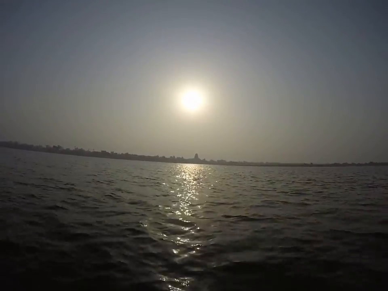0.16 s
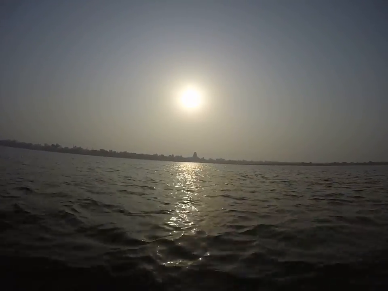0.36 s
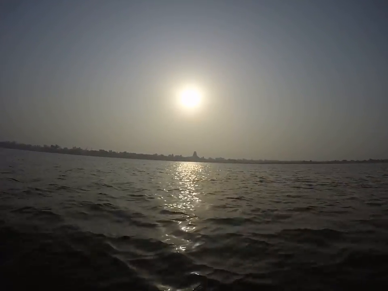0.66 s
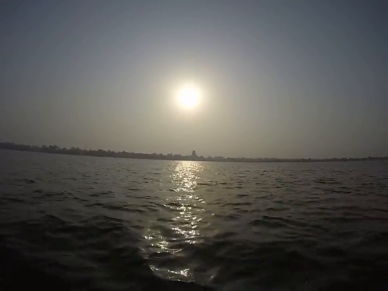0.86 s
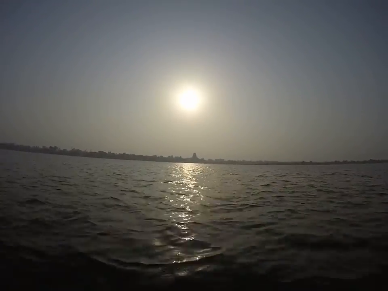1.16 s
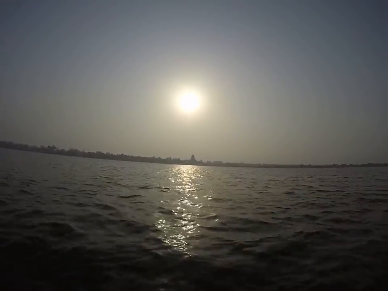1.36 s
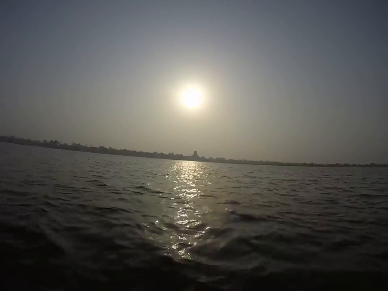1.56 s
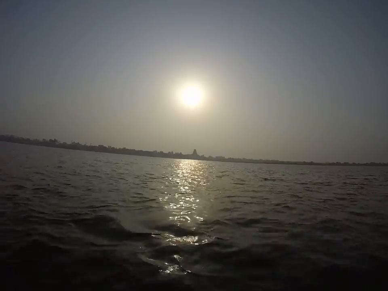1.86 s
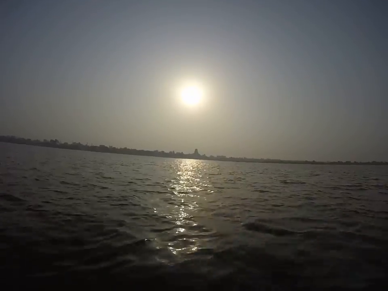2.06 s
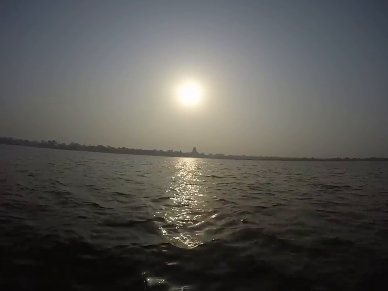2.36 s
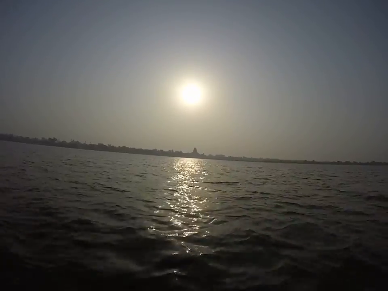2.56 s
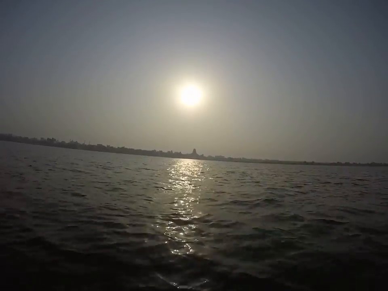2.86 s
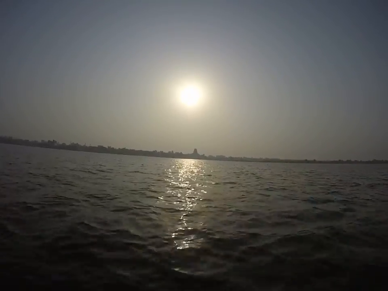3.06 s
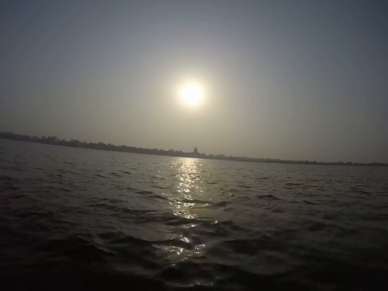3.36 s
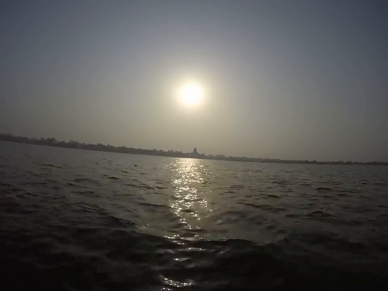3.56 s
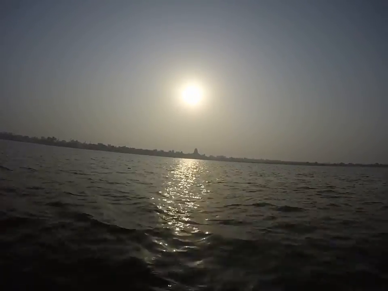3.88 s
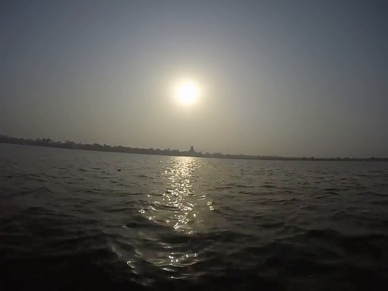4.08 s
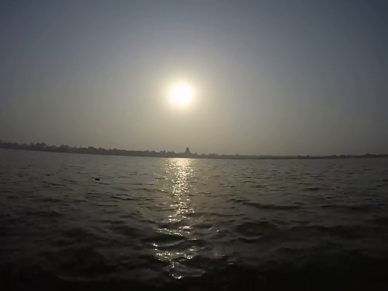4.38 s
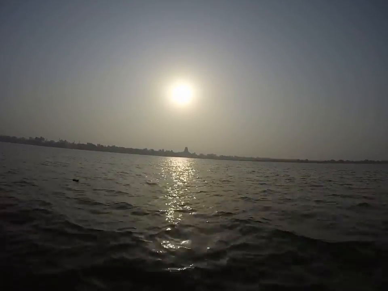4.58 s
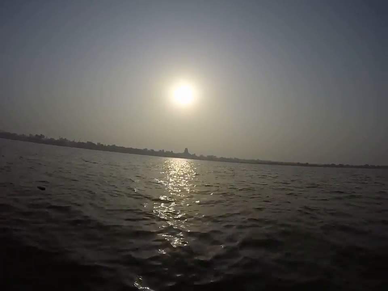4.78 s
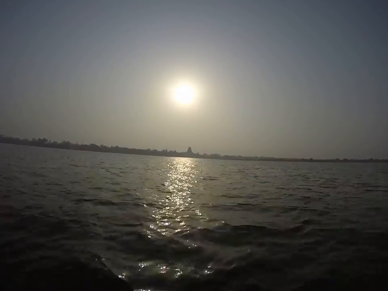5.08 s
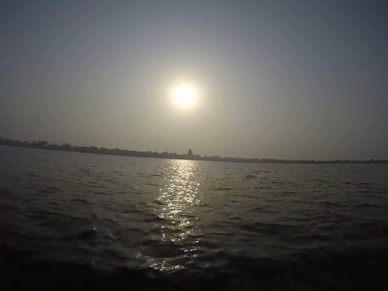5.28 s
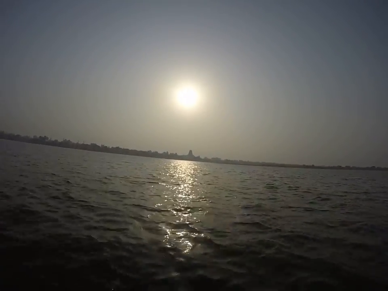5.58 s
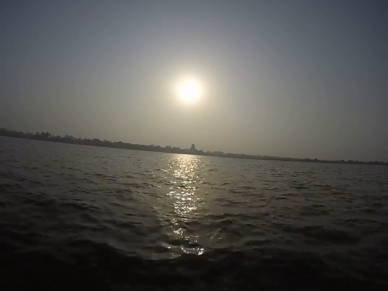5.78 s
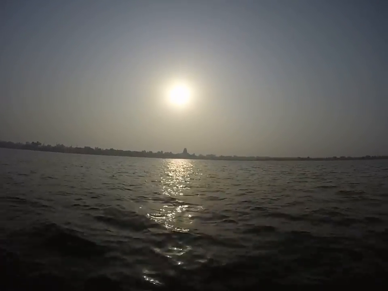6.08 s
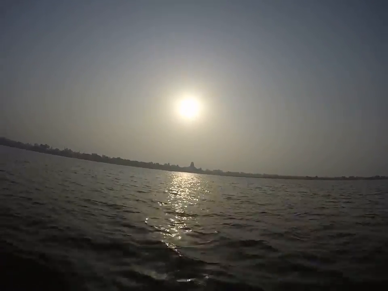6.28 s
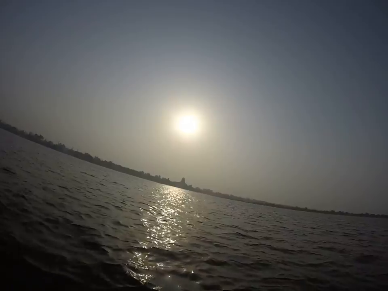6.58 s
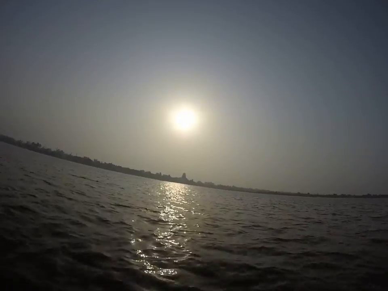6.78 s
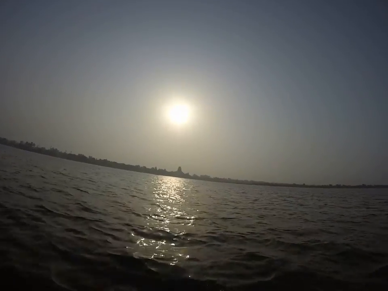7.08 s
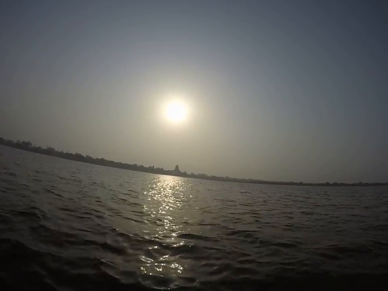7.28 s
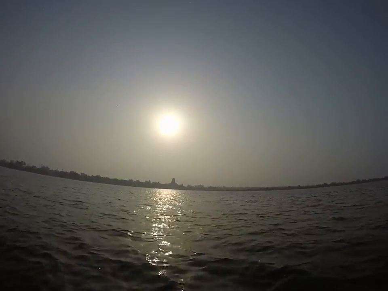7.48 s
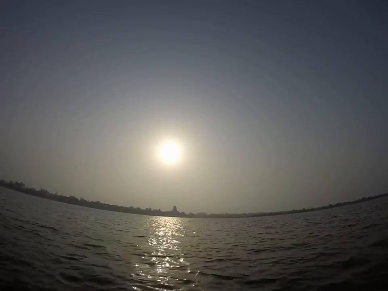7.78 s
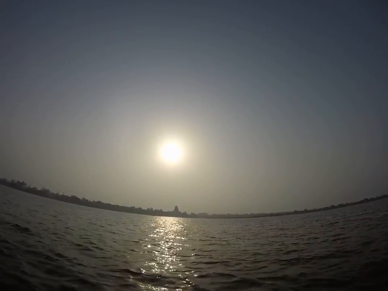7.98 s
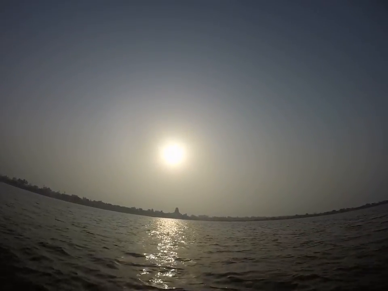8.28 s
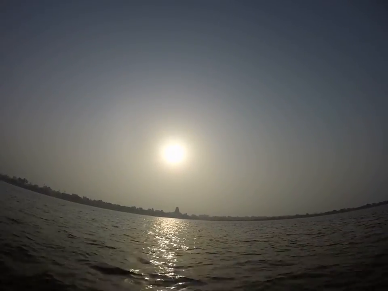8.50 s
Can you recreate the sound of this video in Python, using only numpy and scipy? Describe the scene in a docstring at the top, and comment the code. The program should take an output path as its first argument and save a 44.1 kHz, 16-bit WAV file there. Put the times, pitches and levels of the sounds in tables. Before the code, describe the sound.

A close, boxy, single-microphone sound from inside a waterproof case held low on a motorboat in open choppy water. From 0 s a deep muffled engine drone runs with slight wavering, under low wind buffeting and continual bubbly gurgling from the bow wave. Hard, dry drops tick irregularly and often on the case until about 6.2 s. Soft boomy gusts thump at times, strongly near 1.5 and 2.8 s. A slap comes at 0.9 s, a small splash near 1.2 s, then plips, slaps and light splashes are scattered through 5 s. From about 5.7 s the engine drops in pitch and briefly fades near 6.5 s. Larger splashes and hollow hull slaps cluster from 6 to 7.1 s. Bright hissing spray swells, with another splash burst around 7.6 s and heavy wind thumps. The engine, now a low throb, rises slightly from 7.4 s to the end at 8.6 s as the spray thins.

```python
"""A motorboat crosses choppy water, heard inside a waterproof camera case held low over the bow wave.
From the start harmonics drone as the engine, noise buffets the case, and sharp pulses tick as flying drops;
the bow wave gurgles throughout in bubbles and noise, and strong gusts thump as slow pushes of pressure. From
1 s droplet grains break as splashes; plips and slaps are short filtered pulses. Near 6 s the engine slows and
heavy spray sets in; the biggest splashes come after 6.3 s, and from 7.4 s the engine picks up again."""
import sys
import numpy as np
from scipy.fft import rfft, irfft, next_fast_len
from scipy.io import wavfile
from scipy.ndimage import uniform_filter1d, map_coordinates

SR = 44100
rng = np.random.default_rng(int(sys.argv[2]) if len(sys.argv) > 2 else 0)


def log_audio(samples):
    """Write samples as a 16-bit WAV file to the path given in sys.argv[1]."""
    # one column per channel
    frames = np.atleast_2d(samples).T
    # limit to full scale, then quantise
    limited = np.clip(frames, -1, 1)
    pcm = np.round(limited * 32767).astype(np.int16)
    wavfile.write(sys.argv[1], SR, pcm)


N = 381024  # length [samples], 8.64 s


def amp(db):
    """Decibels to gain."""
    return 10 ** (np.asarray(db) / 20)


def unit(x):
    """Scale to rms 1."""
    return x / np.sqrt(np.mean(x ** 2) + 1e-20)


def along(points, hz):
    """Read (frequency, value) points on a log frequency axis."""
    f, v = np.transpose(points)
    return np.interp(np.log(hz + 1), np.log(f + 1), v)


def curve(rows):
    """Draw a (time, value) automation line, one value per sample."""
    s, value = np.transpose(rows)
    return np.interp(np.arange(N) / SR, s, value)


def swing(rows):
    """A curve about its own mean."""
    value = curve(rows)
    return value - value.mean()


def wobble(rate):
    """A smooth random curve with this many knots a second."""
    knots = rng.standard_normal(int(N * rate / SR) + 4)
    return map_coordinates(knots, [np.arange(N) * rate / SR])


def noise():
    """White noise for the whole scene."""
    return rng.standard_normal(N)


def filtered(x, gain):
    """Apply a gain that depends on frequency."""
    m = next_fast_len(N + SR // 2)
    return irfft(rfft(x, m) * gain(np.fft.rfftfreq(m, 1 / SR)), m)[:N]


def coloured(x, spectrum):
    """Filter x by the (frequency, gain) points, then scale to rms 1."""
    return unit(filtered(x, lambda hz: amp(along(spectrum, hz))))


def add(track, s, sound):
    """Mix a sound into the track at time s."""
    start = max(round(s * SR), 0)
    track[start:start + len(sound)] += sound[:max(N - start, 0)]


def tick(spectrum, tilt_db, knee_hz, spot_db, notches=(), size=2048):
    """One impact as a minimum-phase pulse of peak 1, tilted above the knee, with random ripples of colour."""
    hz = np.fft.rfftfreq(size, 1 / SR)
    octaves = np.log2(np.maximum(hz / knee_hz, 1))
    ripple = map_coordinates(rng.standard_normal(size), [hz / 420])
    dips = sum(db * np.exp(-((hz - centre) / width) ** 2) for centre, width, db in notches)
    level_db = along(spectrum, hz) + tilt_db * octaves + spot_db * ripple + dips
    # folding the cepstrum forward puts all the energy after the hit
    cepstrum = irfft(np.log(amp(level_db)))
    cepstrum[1:size // 2] *= 2
    cepstrum[size // 2 + 1:] = 0
    pulse = irfft(np.exp(rfft(cepstrum)))
    return pulse / np.abs(pulse).max()


def bubbles(low_hz, high_hz, cycles, spread_db, count, size=400):
    """A random cloud of tiny damped rings, at rms 1."""
    when, pitch, strength = rng.random((count, 3)).T[:, :, None]
    hz = low_hz * (high_hz / low_hz) ** pitch
    turns = hz * np.arange(size) / SR
    rings = np.sin(2 * np.pi * turns) * np.exp(-turns / cycles)
    grains = amp(-spread_db * np.log(strength + 0.01)) * rings * np.sqrt(hz)
    where = (when * N).astype(int) + np.arange(size)
    return unit(np.bincount(where.ravel(), grains.ravel(), N)[:N])


# strength of the headwind on the case: (time [s], level [dB])
WIND = [(0, -26), (1.4, -17), (2.3, -21.5), (3.8, -23.5), (4.9, -19.5), (5.9, -24), (6.65, -23),
        (6.95, -19), (7.8, -15), (8.64, -20.5)]
# colour of the tumbling air: (frequency [Hz], gain [dB])
AIR_COLOUR = [(8, -7.5), (22, 5), (34, -3.5), (48, 1), (64, -0.5), (100, -12), (140, -17), (200, -27),
              (400, -80.5)]
# colour of the hull rumble: (frequency [Hz], gain [dB])
RUMBLE_COLOUR = [(60, -16.5), (130, 7), (200, -4.5), (280, -5.5), (400, -13.5), (700, -25), (1500, -62)]
GUST_DB, GUSTS_PER_S = 1.5, 7  # random gusts about the wind strength
RUMBLE_DB, LUMP_DB = -40.5, 2.65  # base level of the hull rumble and size of its random lumps
RUMBLE_PER_CHURN, RUMBLE_PER_WIND, RUMBLE_PER_EXHAUST = 0.8, 0.1, 0.2  # dB per dB of each
RUMBLE_DB_PER_HZ = 0.1473  # gained per Hz that the firing rate falls
SHAKE_DB, SHAKE_S = -14.5, 0.012  # hull shake: level against the slap's table level, half length


def buffeting():
    """Air tumbles round the case in gusts while the hull rumbles through the chop and shakes at each slap."""
    t = np.arange(N) / SR
    gusts = amp(curve(WIND) + GUST_DB * wobble(GUSTS_PER_S))
    air = gusts * coloured(noise(), AIR_COLOUR)
    drive_db = RUMBLE_PER_CHURN * swing(CHURN) + RUMBLE_PER_WIND * swing(WIND)
    drive_db += RUMBLE_PER_EXHAUST * swing(EXHAUST) - RUMBLE_DB_PER_HZ * swing(SPEED)
    chop = amp(RUMBLE_DB + drive_db + LUMP_DB * wobble(30))
    shake = sum(amp(db + SHAKE_DB) * np.exp(-((t - s) / SHAKE_S) ** 2) for s, db, _ in SLAPS)
    return air + np.hypot(chop, shake) * coloured(noise(), RUMBLE_COLOUR)


# strong gusts thumping the case: (time of the peak [s], peak level [dB], frequency [Hz])
THUMPS = [(0.219, -14, 42), (0.911, -9.5, 45.5), (1.51, -7.5, 42), (1.93, -10, 45.4), (2.832, -5.5, 43.3),
          (4.949, -10, 46), (5.651, -11, 42), (6.843, -6, 32.2), (7.133, -6.5, 37.2), (7.496, -9, 28),
          (7.836, -4.5, 27), (8.313, -5, 36.2)]


def thumps():
    """Each strong gust gives one slow push of pressure, a cosine under a bell."""
    track = np.zeros(N)
    for s, db, hz in THUMPS:
        cycles = (np.arange(N) / SR - s) * hz
        track += amp(db) * np.cos(2 * np.pi * cycles) * np.exp(-(cycles / 0.67) ** 2)
    return track


# water slapping the hull: (time [s], level before a common trim [dB], tilt [dB per octave])
SLAPS = [(0.903, -15.5, 0.5), (1.492, -24.5, 1), (2.882, -20.5, -7.5), (4.164, -16, -1), (4.326, -19.5, .5),
         (4.707, -18.5, -1.5), (5.082, -19, 0), (6.111, -19, -6), (6.345, -16, -4), (6.37, -13, 4),
         (6.539, -20.5, -6.5), (6.828, -21, 1), (6.8416, -9, 3), (7.0996, -13, -2), (7.741, -16, -2.5)]
# colour of a slap before its tilt: (frequency [Hz], gain [dB])
SLAP_COLOUR = [(60, -33.5), (200, 4.5), (330, -2.5), (600, -9.5), (1000, -8), (1500, -6), (2700, -18),
               (3600, -36), (8000, -54), (15000, -69.5)]


def slaps():
    """Wavelets smack the hull with a short, hollow knock."""
    track = np.zeros(N)
    for s, db, tilt_db in SLAPS:
        knock = tick(SLAP_COLOUR, tilt_db=tilt_db, knee_hz=300, spot_db=3.5)
        add(track, s + 0.001, amp(db - 2.5) * knock)
    return track


# heavy spray, setting in as the boat slows, strongest near 7.6 s, then thinning to the end:
# (time [s], level before the hiss trim [dB])
SHOWER = [(5.9, -87.5), (6.05, -61.5), (6.55, -49), (6.95, -52.5), (7.38, -43.5), (7.65, -43), (8.0, -44.5),
          (8.6, -53)]
SPRAY_DB, SPRAY_PER_CHURN = -60, 0.7  # thin hiss before its trim; dB per dB of churn


def spray_level():
    """Spray in dB: a thin hiss that follows the churn, joined later in power by the shower."""
    thin = amp(SPRAY_DB + SPRAY_PER_CHURN * swing(CHURN))
    return 20 * np.log10(np.hypot(thin, amp(curve(SHOWER))))


# how hard the bow churns the water: (time [s], level before the gurgle trim [dB])
CHURN = [(0, -47), (1.45, -43.5), (1.75, -45), (2.05, -42), (2.8, -42), (3.0, -48), (3.25, -48),
         (3.45, -44), (3.85, -44.5), (4.25, -39.5), (4.55, -44), (5.2, -44), (5.7, -48.5), (6.25, -43.5),
         (6.9, -45.5), (7.6, -44.5), (8.64, -46)]
# colours of the gurgle, the spray and the mist: (frequency [Hz], gain [dB])
GURGLE_COLOUR = [(200, 8), (400, 0.5), (800, -3), (1100, -2.5), (1300, -5.5), (1620, 3), (1900, -6),
                 (2400, 0), (3300, -6), (3800, -16), (6000, -32.5), (15000, -72)]
SPRAY_COLOUR = [(1200, -3.5), (1700, 1.5), (2100, -0.5), (2900, 3), (3700, -4), (4350, 1.5), (5300, -7),
                (6100, 1.5), (7200, -10), (8600, -14), (9700, -8.5), (12000, -21.5), (14800, -35),
                (16000, -59.5)]
MIST_COLOUR = [(4000, -26.5), (8500, -3), (9700, -3.5), (11500, -5), (14700, -8.5), (15400, -35)]
CLUCKS_PER_CHURN, CLUCKS_DB_PER_HZ = 0.99, -0.12  # dB per dB of churn; dB per Hz of firing rate
CLUMP_DB, SPRAY_FLUTTER_DB = 2.4, 1.4  # size of the random level swings


def bow_wave():
    """Bubbles gurgle in churning water under a hiss of spray; heavy spray breaks into a brighter mist."""
    spray_db = spray_level()
    # pockets of air cluck in clumps, more strongly in harder churn and at lower engine speed
    clump_db = CLUMP_DB * wobble(18) + CLUCKS_PER_CHURN * swing(CHURN) + CLUCKS_DB_PER_HZ * swing(SPEED)
    clucks = unit(amp(clump_db)) * bubbles(393, 1550, cycles=0.59, spread_db=2.5, count=1600)
    fizz = bubbles(1035, 4000, cycles=2.65, spread_db=3.0, count=12000, size=200)
    churn = 0.59 * clucks + 0.5 * fizz + noise()
    gurgle = amp(curve(CHURN) + 1.45 + 2.2 * wobble(22)) * coloured(churn, GURGLE_COLOUR)
    hiss_db = spray_db + 1.5 + SPRAY_FLUTTER_DB * wobble(30)
    spray = amp(hiss_db) * coloured(noise(), SPRAY_COLOUR)
    # the mist grows faster than the spray
    mist_db = 1.834 * spray_db + 19.5 + 2.3 * wobble(10)
    mist = amp(mist_db) * coloured(noise(), MIST_COLOUR)
    return gurgle + spray + mist


# waves breaking on the hull: (time of the crest [s], level [dB], fall time to 1/e [s])
SPLASHES = [(1.174, -32.5, 0.011), (1.46, -47, 0.042), (2.38, -39.5, 0.034), (2.8, -37, 0.095),
            (4.166, -39, .02), (4.28, -40.5, 0.012), (5.224, -32.5, 0.0068), (6.018, -35, .025),
            (6.086, -30.5, 0.046), (6.179, -31.5, 0.031), (6.369, -26.5, 0.027), (6.425, -31.5, .03),
            (6.545, -23, 0.0081), (6.809, -36.5, .025), (7.602, -28, 0.016), (7.634, -25.5, 0.031),
            (7.683, -31, 0.0045), (7.715, -31.5, 0.0073)]
# colour of the patter: (frequency [Hz], gain [dB])
PATTER_COLOUR = [(200, -2.5), (600, -11.5), (1150, -12), (1550, 0.5), (2000, -6.5), (2600, 3.5),
                 (3700, -10), (5200, -34.5), (6200, -13.5), (8500, -33), (15000, -54.5)]
# colour of the treble fizz: (frequency [Hz], gain [dB])
FIZZ_COLOUR = [(2000, -6.0), (4000, 0.5), (6200, -3.5), (8500, -9), (15000, -14.5)]
RISE_SHARE = 0.76  # a splash's rise time over its fall time


def splashes():
    """Breaking waves swell and fall away as a dense patter of droplets; bigger ones fizz more in the treble."""
    t = np.arange(N) / SR
    swell = np.zeros(N)
    for s, db, fall in SPLASHES:
        rise_shape = (np.minimum(t - s, 0) / (RISE_SHARE * fall)) ** 2
        fall_shape = np.maximum(t - s, 0) / fall
        swell += amp(db) * np.exp(-rise_shape - fall_shape)
    patter = bubbles(538, 5600, cycles=0.67, spread_db=4.0, count=7000, size=240) + 0.39 * noise()
    fizz = bubbles(3500, 14000, cycles=3.1, spread_db=3.0, count=30000, size=80)
    treble = amp(-5.5) * swell ** 1.313 * coloured(fizz, FIZZ_COLOUR)
    return swell * coloured(patter, PATTER_COLOUR) + treble


# duller plips of water close by: (time [s], level before a common trim [dB], tilt [dB per octave])
PLIPS = [(2.133, -9, 0), (2.363, -12, 0.5), (2.373, -11, 1), (2.401, -8.5, 8), (2.504, -12.5, -0.5),
         (2.794, -7, 3.5), (2.807, -10.5, 1), (3.086, -19.5, -1.5), (3.783, -7.5, 1.5), (3.819, -15, 0),
         (4.056, -5, -0.5), (4.787, -13.5, 1), (5.88, -7, -0.5), (5.978, -17, 1), (6.032, -19, 4),
         (6.345, -11, -3), (6.403, -2, -2), (6.54, -11.5, 0.5), (7.235, -20, -2)]
# colour of a plip before its tilt: (frequency [Hz], gain [dB])
PLIP_COLOUR = [(300, -18), (600, -11), (900, -2), (1600, -2), (2700, 0), (3600, -14), (4600, -23),
               (6300, -21), (8000, -36), (15000, -66)]
FAINT_PLIP_DB, FAINT_PLIP_PER_CHURN = -21.5, 1.0  # stray plips before the trim; dB per dB of churn


def plips(count=6):
    """Blobs of water land close by, each with its own colour; random faint ones are louder in rough water."""
    track = np.zeros(N)
    faint_db = FAINT_PLIP_DB + FAINT_PLIP_PER_CHURN * swing(CHURN)
    faint = [(i / SR, faint_db[i], 0) for i in rng.integers(N, size=count)]
    for s, db, tilt_db in PLIPS + faint:
        plip = tick(PLIP_COLOUR, tilt_db=tilt_db, knee_hz=1800, spot_db=1.7)
        add(track, s + 0.001, amp(db - 3.5) * plip)
    return track


# hard drops on the case: (time [s], level before the tick trim [dB], favoured frequency of the spot [Hz])
DROPS = [(0.0689, -18.5, 1620), (0.0978, -5, 2560), (0.166, -9.5, 2410), (0.3209, -11.5, 1550),
         (0.3709, -5.5, 2190), (0.506, -5, 2430), (0.5531, -10.5, 2450), (0.609, -8.5, 1580),
         (0.6759, -6.5, 2510), (0.7095, -11.5, 2210), (0.7481, -12.5, 2200), (0.8734, -8, 2460),
         (0.8968, -6.5, 2210), (0.9278, -12.5, 1570), (0.9357, -14, 1530), (0.9943, -7.5, 2250),
         (1.0057, -14, 1580), (1.3958, -4, 2450), (1.4985, -4, 2420), (1.6125, -2, 2570),
         (1.651, -16, 1610), (1.699, -20, 2190), (1.75, -19, 1450), (1.7667, -15.5, 1590),
         (1.8099, -12.5, 2210), (1.899, -14.5, 1520), (1.938, -6, 2580), (2.0441, -14, 2140),
         (2.08, -10, 2520), (2.2043, -5, 2570), (2.3486, -6.5, 2440), (2.483, -13, 2480),
         (2.5215, -6.5, 2530), (2.6608, -9, 2470), (2.7814, -6.5, 2200), (2.8928, -3, 2580),
         (2.9215, -3.5, 2550), (2.9518, -3.5, 2570), (2.995, -9, 2450), (3.044, -3, 2190),
         (3.124, -11, 2200), (3.1834, -6, 2570), (3.2254, -12.5, 2470), (3.3156, -12, 1600),
         (3.3902, -7, 2420), (3.5216, -7.5, 2450), (3.5825, -14, 1650), (3.6308, -2.5, 2440),
         (3.9123, -6, 2470), (4.2347, -8, 2520), (4.4218, -5.5, 2390), (4.4615, -18, 1510),
         (4.5221, -8, 1630), (4.545, -5, 2550), (4.7008, -7.5, 2510), (4.8417, -8, 2540),
         (4.8925, -6.5, 2190), (4.9502, -4, 1560), (4.9659, -12.5, 1540), (5.1657, -4, 2260),
         (5.3213, -4.5, 2210), (5.3379, -14, 1650), (5.3656, -2, 2450), (5.3948, -12.5, 1560),
         (5.4305, -7, 2200), (5.4648, -6.5, 2200), (5.5804, -9.5, 1600), (5.6101, -7.5, 2460),
         (5.6501, -5.5, 2490), (5.6647, -5, 2440), (5.7135, -4.5, 2440), (5.792, -4, 2500),
         (6.0858, -3.5, 2410), (6.1943, -11.5, 2100)]
# colour of the case when struck: (frequency [Hz], gain [dB])
CASE_COLOUR = [(300, -42), (950, -22), (1250, -17), (1450, -2.5), (1900, -5.5), (2550, 1), (3100, -14),
               (4300, -11.5), (5000, -20), (6050, -17.5), (7900, -27.5), (8700, -36), (11000, -49),
               (15000, -77.5)]
# antiresonances of the case: (frequency [Hz], width [Hz], gain [dB])
NOTCHES = [(1174, 65, -21.5), (3662, 150, -14.5), (4670, 100, -14), (5530, 192, -25.5)]
# the case's lingering ring: (frequency [Hz], mean level against the drop [dB], t60 [s])
RING = [(4540, -45.5, 0.14), (2170, -39.5, 0.12), (2900, -14, 0.011), (5370, -52.5, 0.078)]
SPOT_WIDTH_HZ, SPOT_DB = 370, 3.5  # how the struck spot lifts its favoured pitch
DROPLET_DB, DROPLET_HZ, DROPLETS_END_S = -23, 1600, 7.8  # faint droplets at random times in the first 7.8 s


def drops(count=4):
    """Drops strike the case: a hard tick, brighter for louder drops, then a faint ring of the shell."""
    track, t = np.zeros(N), np.arange(SR // 5) / SR
    droplets = [(s, DROPLET_DB, DROPLET_HZ) for s in DROPLETS_END_S * rng.random(count)]
    for s, db, spot_hz in list(DROPS) + droplets:
        tilt_db = 0.72 * (max(db, -17) + 4.0) + rng.normal(0, 0.51)
        dips_and_spot = NOTCHES + [(spot_hz, SPOT_WIDTH_HZ, SPOT_DB)]
        hit = tick(CASE_COLOUR, tilt_db=tilt_db, knee_hz=1610, spot_db=2.02, notches=dips_and_spot)
        ring = np.zeros(len(t))
        for hz, level_db, t60 in RING:
            decay_db = level_db + rng.normal(0, 3.1) - 60 * t / t60
            ring += amp(decay_db) * np.sin(2 * np.pi * hz * t)
        onset = 1 - np.exp(-t / 0.00024)
        add(track, s + 0.000966, amp(db - 1.7) * hit)
        add(track, s + 0.000923, amp(db) * ring * onset)
    return track


# the throttle, cruising, easing off, picking up again: (time [s], firing rate [Hz])
SPEED = [(0, 80.3), (.5, 82), (.96, 90.7), (1.6, 85.8), (2.15, 83.8), (2.98, 88.4), (3.7, 81.7), (4.5, 81),
         (5.1, 79.3), (5.73, 76.7), (6.33, 59), (6.88, 50.3), (7.35, 47.8), (7.6, 50.3), (8.01, 59),
         (8.64, 62.4)]
# loudness of the exhaust before the muffler: (time [s], level [dB])
EXHAUST = [(0, -21), (.9, -19), (1.35, -13.5), (1.7, -19.5), (2.87, -18.5), (2.99, -25.5), (3.4, -22.5),
           (3.56, -17.5), (3.8, -23.5), (4.33, -14.5), (4.6, -21.5), (4.9, -17), (5.73, -25), (5.9, -29.5),
           (6.33, -26), (6.5, -49.5), (6.75, -29), (7.3, -20), (8.64, -21)]
# what the muffler lets through: (frequency [Hz], gain [dB])
MUFFLER = [(48, 2), (56, -2.5), (62, -3), (78, 0.5), (100, -1.5), (125, -3), (158, -16), (180, -14),
           (240, -34)]
# fourth harmonic, before its trim and the exhaust swing: (firing rate [Hz], level [dB])
BUZZ = [(48, -43.5), (80, -60.5), (83.5, -48.5), (90, -53.5)]
OVERTONE_FOLLOWS = 0.88  # dB in the overtones per dB of exhaust
OVERRUN_DB = 0.2  # lost by the second and third harmonics per Hz/s of slowing
THIRD_DB = -9  # the third harmonic is weak
WAVER_DB, LUG_DB_PER_HZ, CRUISE_HZ = 0.6, 0.07, 80  # waver, its growth per Hz below cruising speed


def engine():
    """Muffled exhaust: low harmonics of the firing rate, wavering more as the engine lugs below cruise."""
    hz = curve(SPEED)
    exhaust_db = curve(EXHAUST)
    follow_db = OVERTONE_FOLLOWS * swing(EXHAUST)
    slowing = uniform_filter1d(np.maximum(-np.gradient(hz) * SR, 0), size=SR // 5)
    overtone_db = exhaust_db.mean() + follow_db - OVERRUN_DB * slowing + 0.5
    waver_db = WAVER_DB + LUG_DB_PER_HZ * np.maximum(CRUISE_HZ - hz, 0)
    unsteady_hz = hz * (1 + 0.0037 * wobble(25))
    phase = 2 * np.pi * np.cumsum(unsteady_hz) / SR
    levels = {1: exhaust_db + along(MUFFLER, hz),
              2: overtone_db + along(MUFFLER, 2 * hz),
              3: overtone_db + along(MUFFLER, 3 * hz) + THIRD_DB,
              4: along(BUZZ, hz) + 0.4 * follow_db - 0.8}
    drone = np.zeros(N)
    for k, db in levels.items():
        tone = np.sin(k * phase + rng.uniform(0, 2 * np.pi))
        drone += amp(db + waver_db * wobble(14)) * tone
    return np.sqrt(2) * drone  # so the levels are rms


def scene():
    """Everything reaches one microphone inside the case."""
    background = buffeting() + thumps() + slaps()
    water = bow_wave() + splashes() + plips() + drops()
    return (background + water + engine())[None]


TOP_HZ = 15300  # band limit


def record(dry):
    """Round off the highest peaks near 0.98, then keep nothing above the band limit."""
    rounded = dry / (1 + np.abs(dry / 0.98) ** 20) ** (1 / 20)
    return np.array([filtered(channel, lambda hz: hz < TOP_HZ) for channel in rounded])


dry = scene()
out = record(dry)
log_audio(out)
```